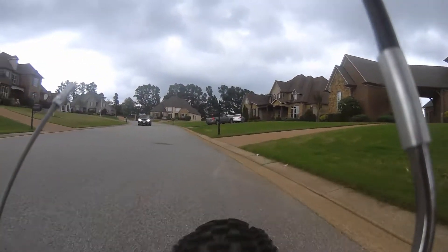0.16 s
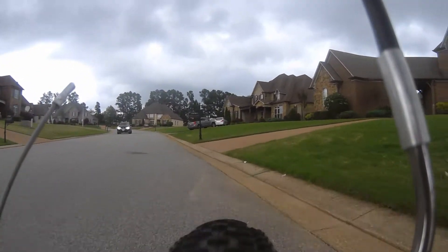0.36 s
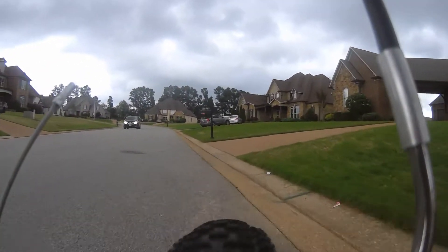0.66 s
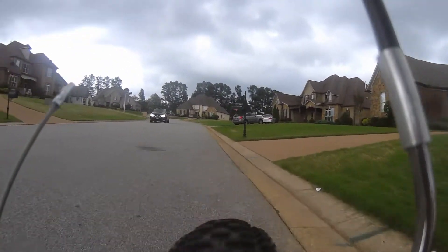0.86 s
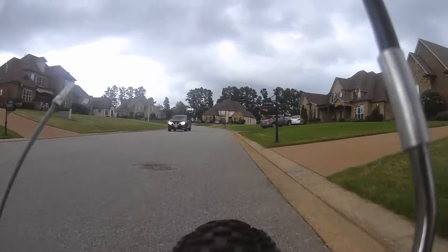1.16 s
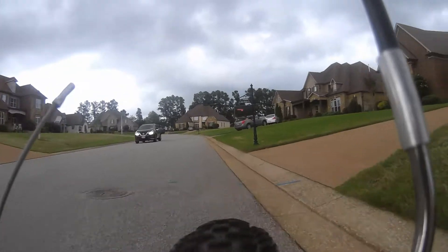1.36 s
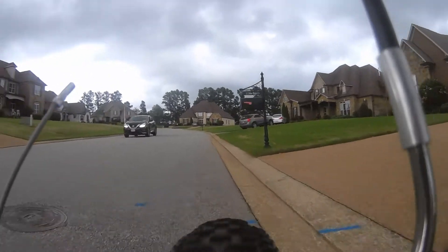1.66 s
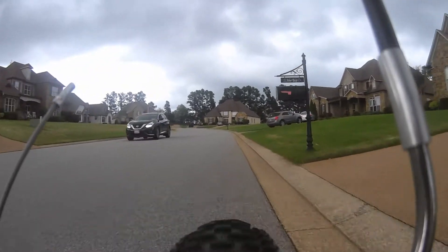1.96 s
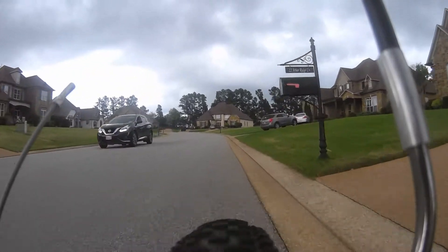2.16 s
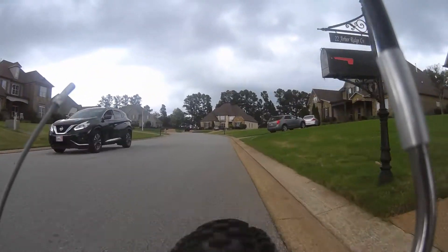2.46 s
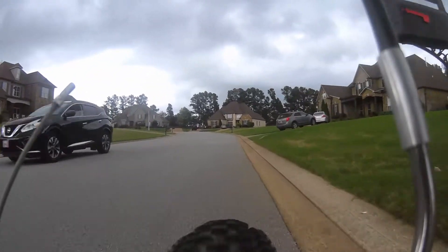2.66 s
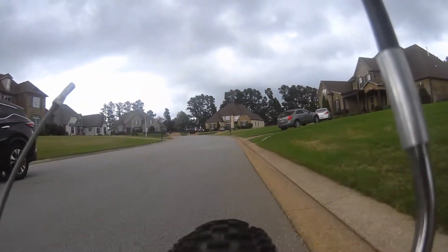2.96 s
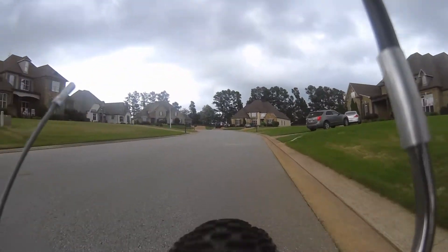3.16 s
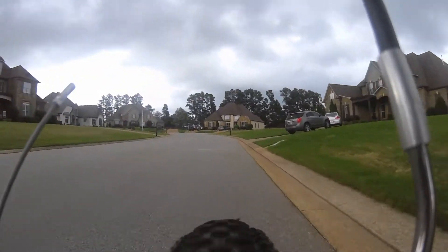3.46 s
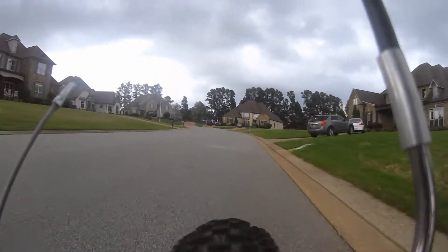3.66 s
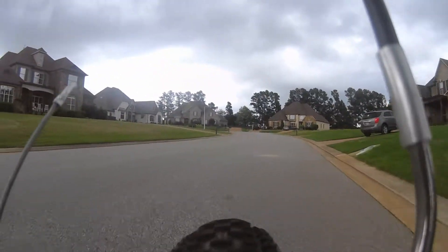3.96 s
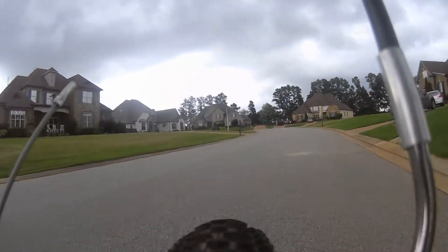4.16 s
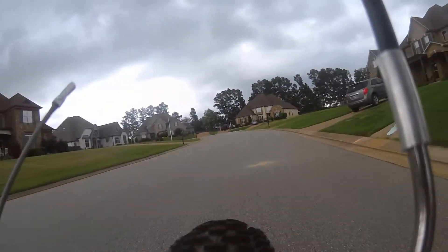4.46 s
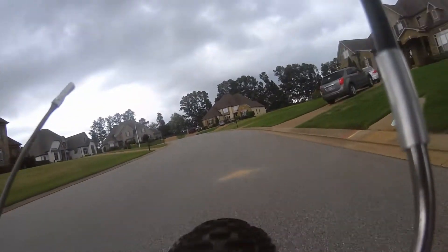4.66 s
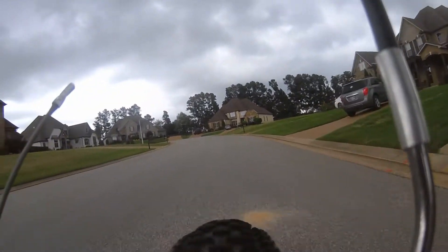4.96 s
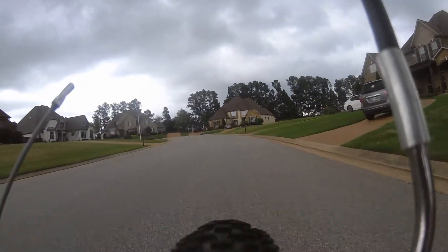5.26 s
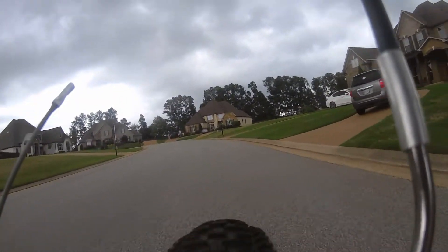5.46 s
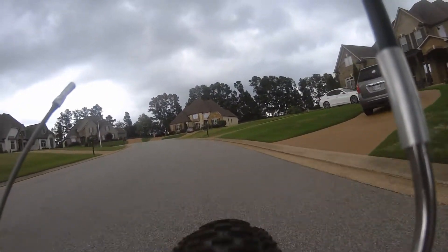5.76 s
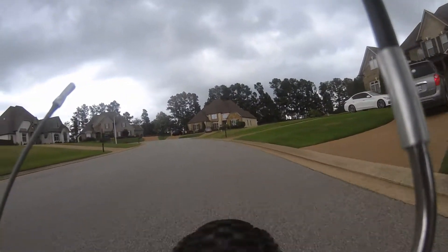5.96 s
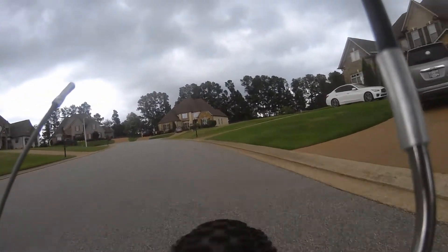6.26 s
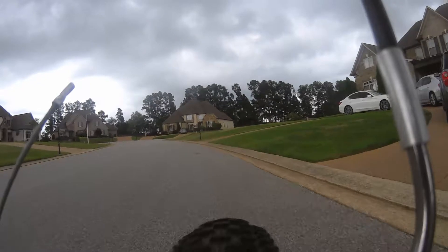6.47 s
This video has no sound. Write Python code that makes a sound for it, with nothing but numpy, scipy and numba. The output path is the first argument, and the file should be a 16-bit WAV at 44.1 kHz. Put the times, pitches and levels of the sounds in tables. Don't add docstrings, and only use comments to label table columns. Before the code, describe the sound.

Frame-mounted, low-quality close sound of a bike ride outdoors: a buzzing, wavering tyre drone and coarse asphalt rumble throughout. A faint tyre whoosh from an oncoming car rises and fades just before halfway. Wind then grows stronger and flaps the microphone, a hard rattling knock hits, and pedal pushes swell the hum. Later come heavy wind pops and a second knock, then weaker rolling. Small stones thud, cables tick and a brake pad rubs lightly.

```python
import sys
import numpy as np
from scipy import signal
from scipy.fft import rfft, irfft
from scipy.io import wavfile
from scipy.ndimage import uniform_filter1d
from numba import njit

SR = 44100
rng = np.random.default_rng(int(sys.argv[2]) if len(sys.argv) > 2 else 0)


def log_audio(samples):
    frames = np.atleast_2d(samples).T
    limited = np.clip(frames, -1, 1)
    pcm = np.round(limited * 32767).astype(np.int16)
    wavfile.write(sys.argv[1], SR, pcm)


def makeup_ratio(level_db):
    decades = np.asarray(level_db, float) / 20
    return 10 ** decades


N = 291942
T = np.arange(N) / SR


def unit(x):
    return x / np.sqrt(np.mean(x ** 2))


def coloured(points, lo_hz=0, hi_hz=SR):
    hz, db = np.transpose(points)
    f = np.arange(1, N // 2 + 2) * SR / N
    gain = unit(makeup_ratio(np.interp(np.log(f), np.log(hz), db)))
    in_slice = (f >= lo_hz) * (f < hi_hz)
    return irfft(rfft(rng.standard_normal(N)) * gain * in_slice, N)


def band(x, hz, width):
    edges_hz = hz * np.array([1 / (1 + width), 1 + width])
    return signal.sosfilt(signal.butter(1, edges_hz, "band", fs=SR, output="sos"), x)


def walk(rate):
    hold = int(SR / rate)
    held = np.repeat(rng.standard_normal(N // hold + 1), hold)[:N]
    return unit(uniform_filter1d(uniform_filter1d(held, hold), hold))


def swells(centres_s, heights, lengths_s):
    return sum(h * np.exp(-((T - s) / w) ** 2) for s, h, w in np.broadcast(centres_s, heights, lengths_s))


def scatter(share, rate):
    return 1 + share * (walk(rate) + 1j * walk(rate))


def bursts(table, colour, attack_ms):
    length = 6000
    out, u = np.zeros(N + length), np.arange(length) / SR
    for start_s, peak_db, control, t60_s in table:
        fade = makeup_ratio(-60 * u / t60_s) * np.minimum(u * 1000 / attack_ms, 1)
        burst = colour(rng.standard_normal(length) * fade, control)
        a = int(start_s * SR)
        out[a:a + length] += makeup_ratio(peak_db) * burst / np.abs(burst).max()
    return out[:N]


def ride():
    # time_s, knob_pair_rate_hz, tyre_load_db
    ride_points = [(0, 269.1, -0.5), (.9, 274.1, 0), (1.6, 279.2, 0), (2.4, 274, 1), (3.05, 269.1, 1.5),
                   (3.25, 272, 2), (3.6, 277, 2), (4.28, 277, -1), (4.6, 290.6, 0), (5.15, 284, -3.5),
                   (5.45, 284, -9), (5.66, 287, -9.5), (5.88, 290, -3.5), (6.1, 292, -12), (6.62, 286, -10)]
    # centre_s, rate_surge_hz, extra_load_db
    strokes = [
        (2.779, 11, -1),
        (3.63, 21, 2.5),
        (4.069, 20, 2.5),
        (4.51, 16, 1),
        (5.0, 26, 0.5),
        (5.469, 36, 8.5),
        (5.9, 14, 1.5),
        (6.38, 22, -0.5),
    ]
    stroke_length_s = 0.12
    time_s, rate_hz, load_db = np.transpose(ride_points)
    stroke_s, surge_hz, push_db = np.transpose(strokes)
    knob_hz = np.interp(T, time_s, rate_hz) + swells(stroke_s, surge_hz, stroke_length_s)
    return knob_hz, np.interp(T, time_s, load_db) + swells(stroke_s, push_db, stroke_length_s)


def tread(knob_hz, load_db):
    # centre_s, change_db, length_ms
    patches = [(.1, 2.5, 130), (.35, -12.5, 25), (.6, 4, 99), (.71, -8.5, 30), (1.12, -8.5, 41),
               (1.269, 2, 66), (5.449, -1.5, 77), (1.6, -6, 68), (2.04, 3.5, 24), (2.11, -7, 47),
               (2.23, 3.5, 25), (2.33, -10, 46), (2.52, -2, 70), (2.69, -8.5, 44), (2.84, -5, 13),
               (2.91, -8.5, 5), (3.03, 10, 30), (3.2, -15, 90), (3.39, 8.5, 35), (3.62, 2.5, 110),
               (3.84, -6, 39), (4.14, 4.5, 220), (4.47, 9.5, 34), (4.75, -11, 35), (4.94, -15, 21),
               (5.08, -14.5, 23), (5.22, 5.5, 30), (5.78, -13, 60), (6.28, -8, 25), (6.56, 6, 70)]
    s, change_db, length_ms = np.transpose(patches)
    hum_db = -17 + 0.9 * load_db + swells(s, change_db, length_ms / 1000)
    flutter_db = 1.5 * walk(34) + 1.5 * walk(70)
    phase = 2 * np.pi * np.cumsum(knob_hz * (1 + .012 * walk(45))) / SR
    hum = makeup_ratio(hum_db + flutter_db) * np.real(scatter(.36, 38) * np.exp(1j * phase))
    beat_db = 3 * np.cos(2 * np.pi * 5.8 * (T - .46))
    lean_db = -3 * np.abs(T - .6)
    centre_db = -23 + 0.72 * load_db + lean_db + beat_db + 1.1 * walk(40)
    centre_phase = 2 * np.pi * np.cumsum(406 * (1 + 0.0164 * walk(35))) / SR
    return hum + makeup_ratio(centre_db) * np.real(scatter(.3, 30) * np.exp(1j * centre_phase))


def road(load_db):
    # pitch_hz, level_db (per Hz)
    road_colour = [(40, -9.5), (150, 0.5), (230, -1.5), (330, 10.5), (470, 5.5), (620, 1.5), (750, 2),
                   (900, -1), (1000, -6.5), (1500, -15), (2200, -20.5), (3300, -34.5), (5000, -42.5),
                   (8000, -44)]
    slices_hz = [0, 400, 650, 950, 1800, 3500, SR]
    grit_db = -0.5 + 0.045 * load_db
    shared_db = .9 * walk(50)
    roar = np.zeros(N)
    for lo, hi in zip(slices_hz, slices_hz[1:]):
        patch_db = shared_db + .8 * walk(35) + grit_db * (lo > 900)
        roar += makeup_ratio(patch_db) * coloured(road_colour, lo, hi)
    return makeup_ratio(-24 + load_db) * roar


def eddies(gust_db):
    per_second = 32
    gap, depth, fall, rise = rng.random((4, 400))
    s = np.cumsum((.4 + 1.2 * gap) / per_second)
    db = -25.5 + 2 * np.interp(s, T, gust_db) - 8.4 * depth
    fall_ms, rise_ms = 4.5 * (.4 + 1.9 * fall), 3.5 * (0.43 + 1.7 * rise)
    return np.transpose([s, db, fall_ms, rise_ms])[s < T[-1]]


def wind(load_db):
    # centre_s, length_s, strength_db (over the calm)
    gusts = [(0.307, 0.089, 4.5), (.52, 0.11, 3), (1.329, 0.08, 2.5), (2.732, 0.054, 6), (2.922, .04, 3.5),
             (3.417, 0.099, 7.5), (3.738, 0.14, 9), (3.989, .07, 7), (4.498, .09, 11.5),
             (4.869, 0.037, 11.5), (5.499, .13, 8.5), (5.716, 0.049, 8), (5.845, 0.064, 5.5),
             (5.998, 0.042, 8), (6.236, 0.12, 6.5), (5.36, .06, 4.5), (6.582, 0.11, -6), (1.85, 0.27, -3),
             (4.68, .06, 3)]
    # time_s, depth_db, fall_ms, rise_ms
    buffets = [(0.2932, 0.5, 2.3, 0.69), (0.311, 0, 1.1, 1.4), (0.4389, -2, 5, 2.4), (0.458, -2, 3.4, 1.6),
               (0.565, -1.5, 1.9, 1.2), (.5948, -3.5, 12, 1.5), (2.7307, -6, 8.2, 8.6),
               (3.2275, -3.5, 4, 1.2), (3.2772, -5.5, 5.3, 2.1), (3.3671, -2.5, 3.2, 1.2),
               (3.4131, 2.5, 1.8, 0.75), (3.46, -6.5, 13, 3.3), (3.4753, -4.5, 4, 1.7),
               (5.8251, -7.5, 5.3, 4.7), (3.7943, -1, 2.4, 1.7), (4.0098, -4.5, 5, 3),
               (4.3473, -3, 6.4, 1.3), (4.5139, 2.5, 2.4, .9), (4.531, 1.5, 5.5, 0.92),
               (4.847, -1, 17, 0.3), (4.8884, -6, 5.7, .9), (4.9207, -6.5, 3.2, 0.97),
               (5.495, -1, 1.4, 0.58), (5.5303, 12.5, 0.76, 0.83), (5.5543, 8.5, 2.9, 1.4),
               (5.5789, 1.5, 2.8, 0.47), (5.8896, -0.5, 1.9, 0.84), (5.9252, -4.5, 2.7, 10),
               (6.0376, -1, 2.4, 0.84), (6.1958, -5.5, 2.2, 2.6)]
    s, length_s, strength_db = np.transpose(gusts)
    gust_db = swells(s, strength_db, length_s)
    pressure = np.zeros(N)
    around = np.arange(-2000, 2000)
    u_ms = around / SR * 1000
    for time_s, depth_db, fall_ms, rise_ms in [*buffets, *eddies(gust_db)]:
        at = np.clip(int(time_s * SR) + around, 0, N - 1)
        side_ms = np.where(u_ms < 0, fall_ms, max(rise_ms, .88))
        pressure[at] -= makeup_ratio(depth_db + 1.0) * np.exp(-(u_ms / side_ms) ** 2)
    squeezed = 1.3 * np.tanh(pressure / 0.96)
    leaky = signal.sosfilt(signal.butter(2, 10.5, "high", fs=SR, output="sos"), squeezed)
    rumble = coloured([(5, -8.5), (15, -1), (60, -5), (120, -9.5), (250, -10.0), (600, -27),
                       (2500, -58), (20000, -100)])
    rumble_db = -28 + 1.1 * gust_db + 0.37 * load_db + 2.7 * walk(20)
    heave = unit(band(rng.standard_normal(N), 23.8, 0.38))
    return leaky + makeup_ratio(-39.5 + 1.5 * gust_db) * heave + makeup_ratio(rumble_db) * rumble


def car():
    # pitch_hz, level_db (per Hz)
    car_colour = [(500, -10.5), (1000, 12), (2000, 1.5), (3000, 0.5), (5000, -16.5), (8000, -28)]
    closest_s, gap_s = 2.9, 0.39
    distance = np.hypot(1, (T - closest_s) / gap_s)
    fading = np.where(T > closest_s, 1.8, 1.1)
    return makeup_ratio(-38.5 + .8 * walk(20)) * coloured(car_colour) / distance ** fading


def thuds():
    # centre_s, peak_db, pitch_hz, length_ms
    soft_thuds = [(.119, -15.5, 708, 1.5), (1.183, -16, 179.8, 9.9), (2.116, -19.5, 750, 2),
                  (2.297, -15, 790, 2), (2.302, -12.5, 183.4, 5), (2.935, -13, 398, 1),
                  (3.6095, -4.5, 674, 1.3), (3.7385, -16, 815, 1), (3.742, -1.5, 295.5, 5.9),
                  (5.226, -22, 704, 1), (5.268, -25.5, 695, 1.5), (5.578, -22.5, 700, 1.7),
                  (5.6505, 0.5, 243, 2.6), (5.834, -22, 620, 2), (5.862, -23, 600, 2.7), (6.1948, -4, 339, 1.1)]
    u = np.arange(-800, 800) / SR
    out = np.zeros(N)
    for centre_s, peak_db, pitch_hz, length_ms in soft_thuds:
        at = np.round((centre_s + u) * SR).astype(int)
        bell = np.exp(-(u * 1000 / length_ms) ** 2)
        np.add.at(out, at, -makeup_ratio(peak_db) * bell * np.cos(2 * np.pi * pitch_hz * u))
    return out


def rubs():
    # start_s, length_s, level_db
    brushes = [(0.29, 0.082, -46.5), (0.681, 0.022, -60.5), (1.083, 0.034, -52), (1.439, 0.057, -50.5),
               (2.219, 0.026, -49), (2.605, 0.045, -52.5), (3.051, 0.036, -53), (3.374, 0.045, -52.5),
               (4.295, 0.11, -53.5), (4.441, 0.046, -45), (4.804, 0.051, -55.5), (5.45, .03, -60),
               (5.459, 0.05, -55), (6.169, 0.047, -53.5)]
    # pitch_hz, width_hz, level_db, moment (share of the pass)
    rim_parts = [
        (1102, 160, 7, 0.4),
        (4700, 500, -3, 0.1),
        (3600, 300, -1.5, 0.45),
        (6990, 900, -7, .55),
        (5150, 300, -2.5, 0.82),
        (2533, 600, -2, 0.6),
    ]
    out = np.zeros(N)
    for pitch_hz, width_hz, part_db, moment in rim_parts:
        grains = rng.standard_normal(N) * makeup_ratio(3.6 * walk(250))
        scrape = unit(band(grains, pitch_hz, width_hz / pitch_hz / 2))
        for start_s, length_s, level_db in brushes:
            a, n = int(start_s * SR), int(length_s * SR)
            spot = .4 + np.exp(-((np.linspace(0, 1, n) - moment) / .15) ** 2)
            touch = signal.windows.tukey(n, .2) * spot
            out[a:a + n] += makeup_ratio(level_db + part_db) * touch * scrape[a:a + n]
    return out


def snap(noise, khz):
    return band(band(noise, 1000 * khz, .4), 1000 * khz, .4)


def cable_ticks():
    # start_s, peak_db, centre_khz, t60_s (time to die away by 60 dB)
    ticks = [(.9098, -27.5, 3.6, 0.016), (2.2325, -25.5, 1.5, .012), (3.651, -25.5, 2.7, .012),
             (3.9506, -25.5, 3.8, 0.0066), (4.9866, -37.5, 8.7, 0.0081), (5.0996, -27.5, 6, .007),
             (5.167, -37, 4.6, 0.0092), (5.228, -37, 3.9, 0.022), (5.525, -29, 2.5, .01),
             (5.5514, -28.5, 4.9, 0.011), (6.2852, -45, 6, .008), (6.3783, -33, 7, .01),
             (6.5415, -46.5, 3.7, .01)]
    return bursts(ticks, snap, 0.068)


def frame_ring(shake, contact_ms):
    # pitch_hz, width_hz, level_db
    frame_tones = [
        (276, 41, 2.5),
        (608, 750, -1),
        (940, 380, 3.5),
        (1404, 170, 3.5),
        (1870, 760, -3),
        (2484, 210, -5.5),
        (2950, 240, -4),
        (4810, 1500, -6.5),
        (7020, 1500, -6),
    ]
    pole = np.exp(-1000 / (contact_ms * SR))
    blow = signal.lfilter([1], np.poly([pole, pole]), shake)
    out = np.zeros(len(shake))
    for k, (pitch_hz, width_hz, level_db) in enumerate(frame_tones):
        out += (-1) ** k * makeup_ratio(level_db) * band(blow, pitch_hz, width_hz / pitch_hz / 2)
    return out


def frame_knocks():
    # start_s, peak_db, contact_ms, t60_s (time for the shake to die away)
    knocks = [
        (3.7345, -10, 0.12, 0.049),
        (3.7405, -4.5, 0.15, 0.046),
        (3.7485, -18.5, 0.073, 0.034),
        (5.6465, -13.5, 0.12, 0.11),
        (5.651, -8.5, 0.18, 0.092),
        (5.66, -26.5, 0.088, 0.21),
    ]
    return bursts(knocks, frame_ring, 0.5)


def scene():
    knob_hz, load_db = ride()
    rolling = tread(knob_hz, load_db) + road(load_db)
    air = wind(load_db) + car()
    hits = thuds() + cable_ticks() + frame_knocks()
    return (rolling + air + rubs() + hits)[None]


@njit
def four_bit_steps(x, grow):
    y, held, step = np.empty(len(x)), x[0], .05
    for i in range(len(x)):
        jump = x[i] - held
        size = min(int(4 * abs(jump) / step), 7)
        held = min(max(held + np.sign(jump) * (size + .5) * step / 4, -1.), 1.)
        step = min(max(step * grow ** max(2 * size - 6, -1), 2e-4), 1.)
        y[i] = held
    return y


def roll_off(x):
    return signal.sosfilt(signal.butter(12, 8810, fs=SR, output="sos"), x)


def record(dry):
    camera_hz = 16000
    slow = signal.resample_poly(dry[0] - .01, camera_hz, SR, padtype="edge")
    stepped = four_bit_steps(np.clip(slow, -1, 1), 1.1)
    back = signal.resample_poly(stepped, SR, camera_hz, padtype="edge", window=("kaiser", 8.))[:N]
    return roll_off(np.clip(back, -1, 1)[None])


dry = scene()
out = record(dry)
log_audio(out)
```